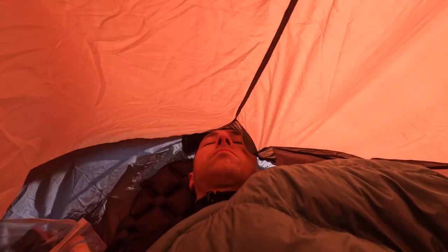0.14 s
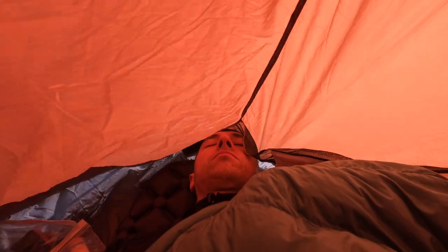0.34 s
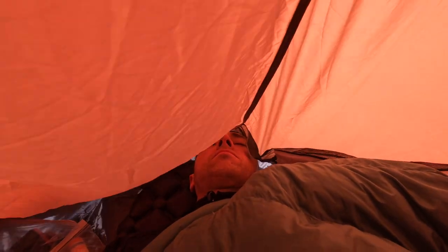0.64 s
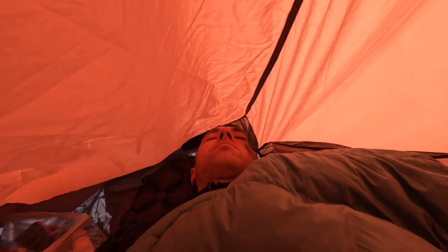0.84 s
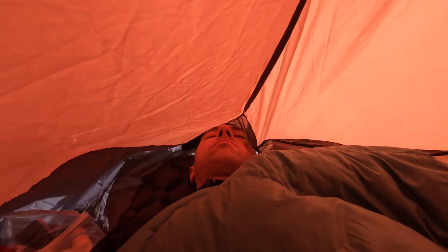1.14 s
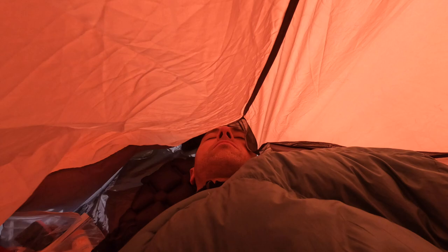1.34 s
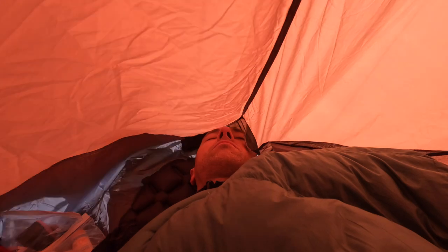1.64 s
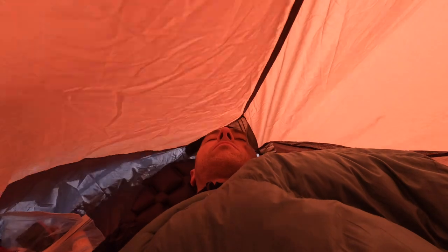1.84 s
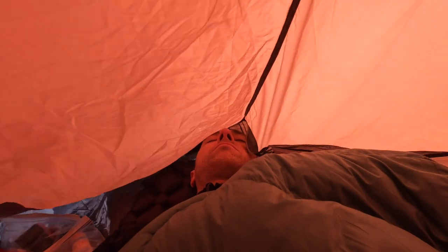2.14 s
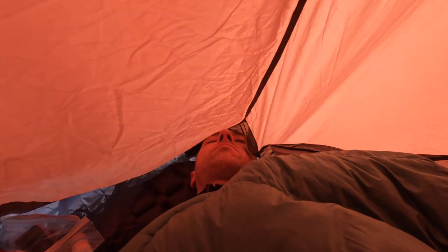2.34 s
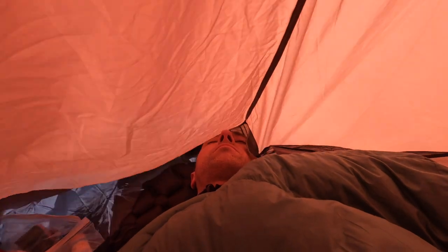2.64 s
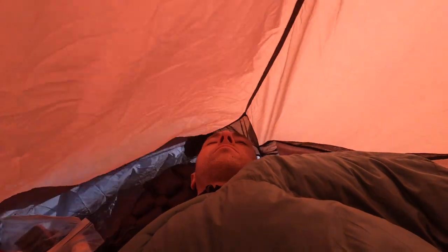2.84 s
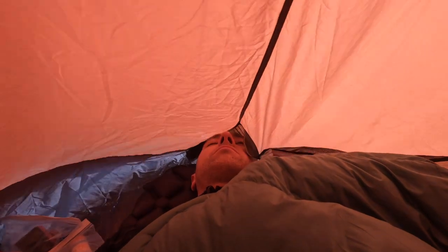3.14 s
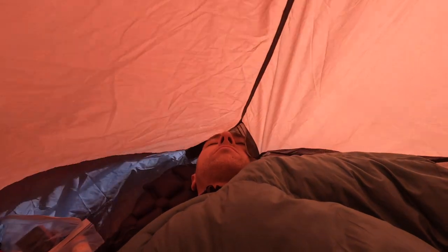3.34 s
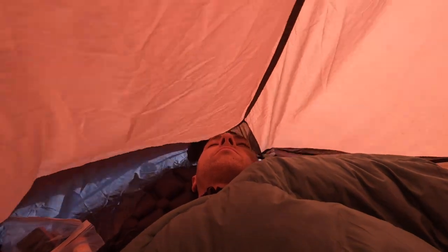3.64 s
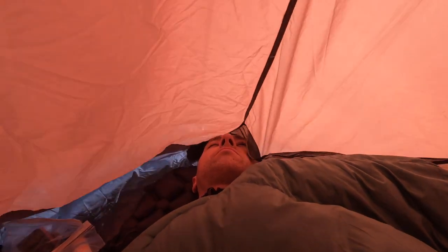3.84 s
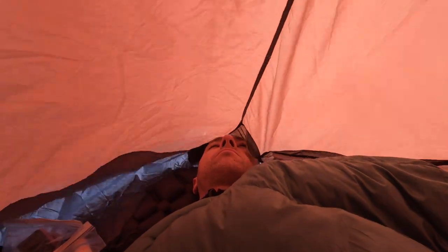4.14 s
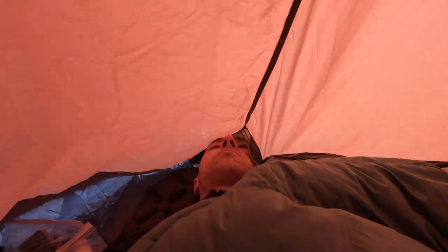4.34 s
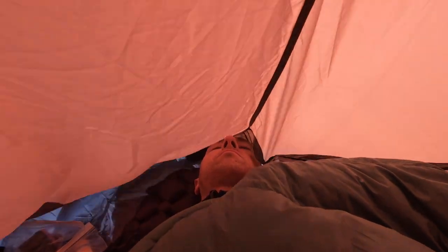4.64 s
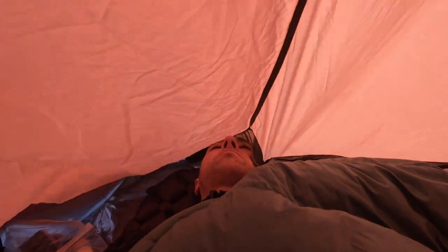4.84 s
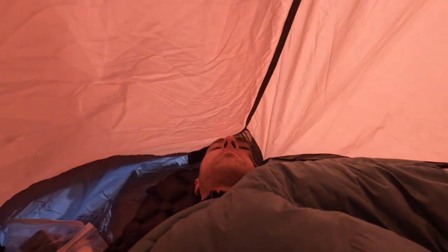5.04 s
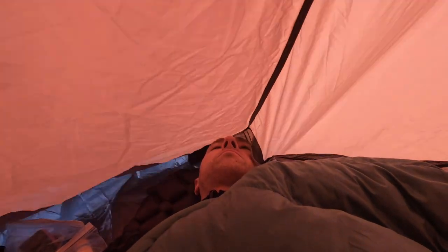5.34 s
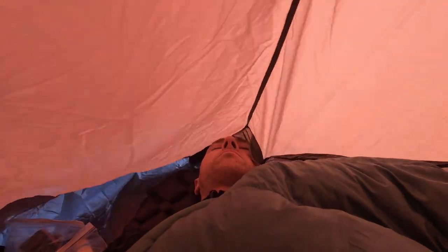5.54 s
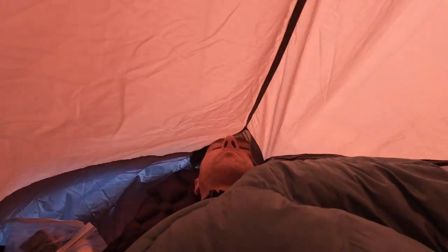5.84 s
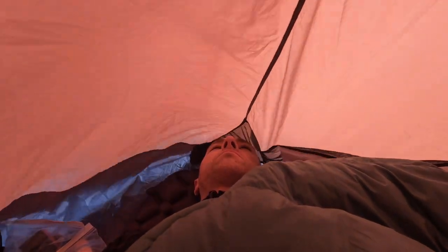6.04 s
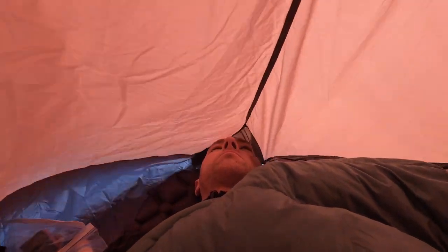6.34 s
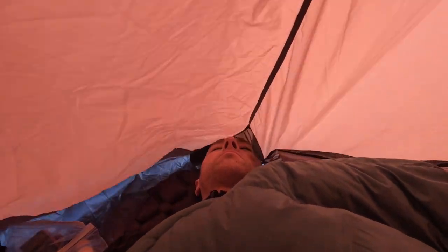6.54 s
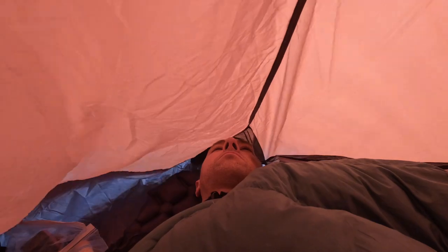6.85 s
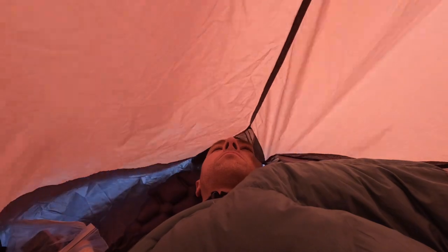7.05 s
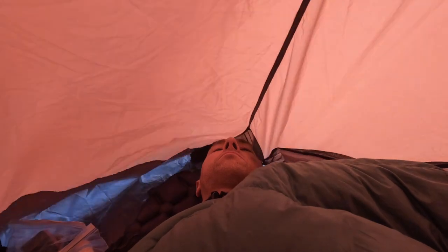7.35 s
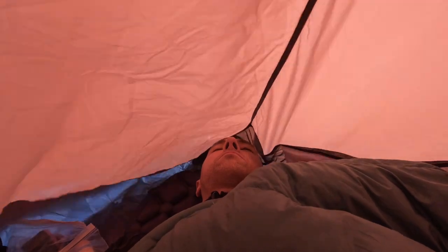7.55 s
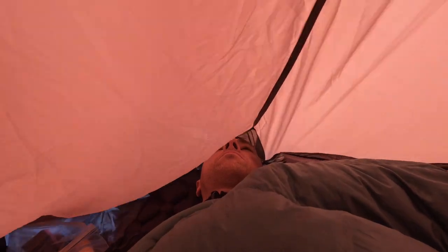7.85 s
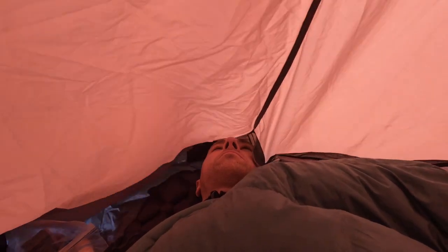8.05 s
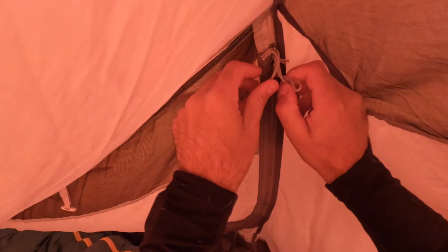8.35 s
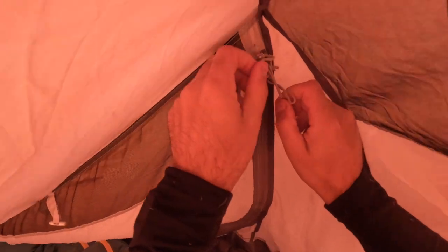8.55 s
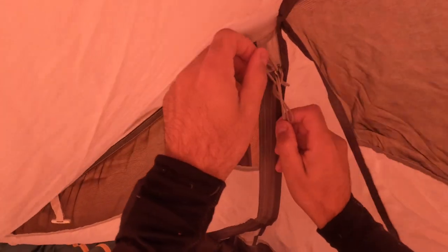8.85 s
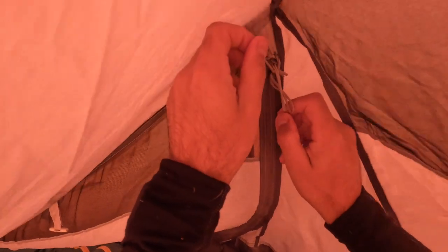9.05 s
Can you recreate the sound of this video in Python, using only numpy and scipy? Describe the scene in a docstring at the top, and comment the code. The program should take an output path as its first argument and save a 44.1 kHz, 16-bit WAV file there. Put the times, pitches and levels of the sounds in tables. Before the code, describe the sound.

Inside a small tent in strong wind, caught by a close, muffled camera microphone, almost mono. From 0 s a deep rumble pumps with dull wall flaps and little brightness; from about 0.9 s blunt thuds and the first snaps arrive. Around 1.5-2.5 s a gust brings dense crinkling, sharp crease ticks and taut cracks, and the sound widens slightly. Snaps cluster at 2.7-3 s, then it eases from 3.3 to 4.2 s before narrowing to the centre. Hard snaps hit at about 4.6 and 4.75 s, with further thumps and flaps to 5.8 s. The strongest crack comes near 6.2 s amid heavy buffeting; bright rustling and pops surge again at 7.0-8.2 s. A faint, very high airy whistle leans left. At about 8.25 s the crinkle stops dead, leaving low drumming rumble, dull flaps, two soft snaps, and a rising swell at 9.2 s.

```python
"""Small tent in a gale

Heard by a camera in a closed housing: gusts pump the tent air (low noise) and buffet the wall (short swings).
The walls flap with a dull roar, crinkle brightly when they whip (flickering noise), and snap taut (brief rings).
The left port whistles thinly near the top (narrow noise). Apart from that whistle the sound is
single-microphone, opens to two ports for a few seconds, and closes; near the end the crinkle stops dead."""
import sys
import numpy as np
from scipy import signal
from scipy.fft import rfft, irfft, next_fast_len
from scipy.io import wavfile
from scipy.ndimage import uniform_filter1d

SR = 44100
rng = np.random.default_rng(int(sys.argv[2]) if len(sys.argv) > 2 else 0)


def put_to_file(sound):
    """Save the sound as 16-bit audio at rate SR, in the file named by the first command-line argument."""
    columns = np.atleast_2d(sound).T  # one column per channel
    safe = np.clip(columns, -1, 1)
    whole_steps = np.round(safe * 32767)
    wavfile.write(sys.argv[1], SR, whole_steps.astype(np.int16))


N = 405279

# Air and wall between flaps: time_s, pumping_db, flap_roar_db, crinkle_db
WIND_LEVELS = [(0, -26, -32, -59), (.5, -27, -36, -59), (1, -25, -35, -53.5), (1.55, -24, -35, -50),
               (1.93, -22, -32, -48), (2, -20, -28.5, -42), (2.3, -20, -28, -41), (2.65, -21.5, -32, -44.5),
               (3.05, -21, -35, -46.5), (3.3, -25, -42, -49.5), (3.8, -27, -41, -55), (4.1, -29, -39, -55),
               (4.4, -25, -35, -48.5), (5, -28, -39, -50), (5.3, -24, -31, -45), (5.68, -26, -36.5, -46.5),
               (5.95, -19.5, -29, -39.5), (6.05, -23, -37, -46.5), (6.62, -23, -35.5, -43.5),
               (6.93, -24, -43, -54), (7.02, -23, -34, -43.5), (7.5, -19.5, -30, -40),
               (8.25, -21, -30, -40), (8.258, -21, -33, -80), (8.4, -27, -40, -80), (8.5, -24, -35.5, -80),
               (9.07, -29, -42, -80), (9.19, -28, -31, -66)]
# Drumming of the taut wall, compared with the pumping: time_s, level_db
DRUM_LEVELS = [(0, -2), (1, -14), (4, -20), (8.2, -17), (8.4, -7), (9.19, 3)]
DRUM_HZ, DRUM_WIDTH_HZ = 76.3, 59
# Single buffets on the wall: start_s, peak_db, thud_hz
WALL_BUFFETS = [(0.89, -15.5, 99), (1.092, -13, 112), (1.304, -18, 61), (1.518, -16.5, 80),
                (1.833, -18.5, 73.5), (1.968, -11.5, 223), (2.153, -12, 118), (2.463, -12, 113),
                (3.605, -17.5, 61), (3.878, -15, 96.9), (4.318, -16.5, 135), (4.568, -26, 61.9),
                (4.661, -18.5, 84), (4.868, -17, 67.3), (5.051, -17.5, 121), (5.463, -10.5, 112),
                (5.756, -14.5, 61), (5.944, -15.5, 75.4), (6.211, -10, 95), (6.259, -16.5, 88.8),
                (7.07, -12.5, 96), (7.545, -12, 139), (7.946, -15, 98), (8.73, -16.5, 64.6)]

# Wind hiss in the left port, before a boost in whistle(): time_s, level_db
PORT_HISS = [(0, -63), (.5, -74), (2, -71), (3, -73), (4.1, -77), (4.4, -64), (5.1, -73), (6, -69),
             (8.2, -74), (8.36, -83), (8.58, -67), (8.75, -74), (9.1, -78), (9.19, -62)]
# Puffs of air across the left port: middle_s, length_s, swell_db
PORT_PUFFS = [(1.69, .1, 5), (2.05, .1, 6), (4.24, .06, 13), (7.32, .05, 12), (7.5, .07, 14)]
WHISTLE_RIGHT_DB = -12

# The wall flaps over: middle_s, length_s, dull_swell_db, bright_swell_db
WALL_FLAPS = [(.17, .124, 8, 1), (.25, .04, 0, 5), (.41, .06, 5, 6), (.625, .05, 4, 5), (.79, .05, 4, 1),
              (.895, .045, 3, 2), (1.118, .062, 7, 9), (1.255, .13, 7, 9), (1.44, .06, 4, 6),
              (1.53, .04, 2, 6), (1.72, .2, 5, 9), (1.85, .06, 3, 6), (1.985, .05, 5, 5), (2.06, .1, 2, 6),
              (2.165, .056, 3, 6), (2.27, .04, 1, 4), (2.52, .136, 3, 6), (3.165, .124, 7, 7),
              (3.25, .04, 2, 4), (3.39, .08, 3, 4), (3.46, .04, 6, 6), (3.62, .046, 4, 9), (3.75, .1, 3, 3),
              (3.885, .05, 5, 1), (4.24, .077, 4, 6), (4.295, .07, 6, 8), (4.445, .06, 4, 6),
              (4.67, .04, 8, 2), (4.63, .04, 0, 4), (4.925, .045, 5, 5), (5.18, .05, 2, 4),
              (5.28, .05, 1, 3), (5.49, .11, 9, 7), (5.58, .07, 1, 5), (5.79, .07, 4, 1),
              (6.2, .062, 7, 12), (6.295, .08, 10, 10), (6.42, .09, 5, 6), (6.52, .04, 2, 4),
              (6.765, .165, 5, 10), (7.08, .062, 4, 6), (7.205, .069, 7, 5), (7.325, .051, 3, 8),
              (7.505, .084, 2, 8), (7.64, .085, 7, 4), (7.715, .04, 1, 6), (8.04, .06, 2, 3),
              (8.56, .13, 6, 0), (8.93, .15, 8, 0)]
AIR_SHARE = .8  # of the dull swell, for the pumping
HISS_SHARE = .6  # of the bright swell, for the hiss

# Sharp creases, before the gain of each layer they drive: start_s, peak_db
CREASE_TICKS = [(.8889, -28), (1.4287, -27), (1.652, -22), (1.6821, -22), (1.8267, -27), (1.9733, -28),
                (1.9844, -22), (2.0295, -18), (2.0777, -19), (2.093, -20), (2.1356, -19), (2.1635, -22),
                (3.3064, -29), (3.6184, -22), (4.2882, -30), (4.4258, -26), (4.611, -27), (5.102, -26.5),
                (5.1986, -30), (5.275, -23), (5.365, -29), (6.0028, -24), (6.108, -27), (6.1599, -28),
                (6.1774, -27), (6.2068, -23), (6.3044, -27), (6.5056, -22), (6.788, -20), (7.0369, -22),
                (7.0803, -26), (7.217, -22), (7.2988, -26), (7.3148, -16), (7.4825, -13), (7.5492, -17),
                (7.5797, -27), (7.6316, -27), (7.675, -27), (7.7084, -15), (7.9139, -24), (8.0257, -27)]
TICK_T60_S = .043  # time to fade by 60 dB

# Cloth snapping taut, the ring alone before the housing dulls it: start_s, peak_db, ring_hz
TAUT_SNAPS = [(.633, -18.5, 689), (.889, -20, 945), (1.055, -21, 985), (1.093, -15, 1000),
              (1.423, -19, 580), (1.524, -12, 1030), (1.729, -16, 1580), (1.968, -16, 1730),
              (2.058, -14, 1300), (2.165, -13, 1500), (2.719, -9, 1110), (2.763, -19, 1460),
              (2.8, -15, 940), (2.866, -19, 1010), (3.002, -14, 1240), (3.458, -17.5, 2190),
              (4.224, -19.5, 2100), (4.287, -12, 1510), (4.385, -19, 2100), (4.576, -7.5, 850),
              (4.61, -21.5, 2170), (4.754, -7.5, 1060), (4.808, -15, 2110), (5.056, -16.5, 870),
              (5.101, -19, 1800), (5.199, -22, 2200), (5.224, -12, 850), (5.397, -10, 1600),
              (5.82, -14, 894), (5.856, -19, 910), (5.959, -13, 1080), (6.002, -18, 2170),
              (6.104, -18, 2230), (6.164, -20, 2330), (6.223, -3, 1030), (6.372, -12, 1400),
              (6.471, -19, 2240), (6.506, -20, 1990), (6.608, -15.5, 790), (6.713, -12, 2350),
              (7.184, -7, 2240), (7.222, -12.5, 762), (7.28, -19, 1630), (7.298, -14, 2130),
              (7.515, -9, 2250), (7.578, -15, 990), (7.609, -11.5, 900), (7.705, -16, 1620),
              (7.835, -11, 1550), (7.913, -17, 2020), (8.041, -14, 1000), (8.193, -15, 1360),
              (8.636, -24, 622), (8.869, -19.5, 680)]
# A harder snap leaves the cloth tauter and its ring shorter: 60 dB fade at -20 dB, and its change
RING_T60_S, RING_S_PER_DB = .019, -.001
# Lesser snaps: least peak above the roar, spread of peaks, range of rings
STRAY_DB, STRAY_SPREAD_DB, STRAY_HZ = 10, 6, (900, 2300)

# How wide the sound is, as the share of the second port: time_s, share (0 to 1)
PORT_WIDTH = [(0, 0), (.4, 0.04), (1.4, 0.15), (1.7, 0.3), (2.3, 0.31), (3.5, 0.46), (3.8, 0.2),
              (4.1, 0.08), (4.3, 0), (9.19, 0)]

# Tone colours, as filter shapes whose overall level is set elsewhere: pitch_hz, level_db
PUMP_COLOUR = [(8, -25), (20, 4.5), (45, 0.5), (100, -6), (180, -13), (300, -21.5), (700, -78.5)]  # squeezed air
FLAP_COLOUR = [(70, -10.5), (160, 0.5), (300, -0.5), (600, -8), (1000, -8), (1900, -14.5), (2300, -19.5),
               (3000, -29.5), (4000, -41.5), (8000, -73), (15000, -100)]  # flapping wall
CRINKLE_COLOUR = [(600, -3.5), (1200, 0.5), (1800, 4.5), (2200, 7), (2850, -7), (3600, -4), (5000, -12),
                  (7000, -20), (8500, -23.5), (10500, -32.5), (12000, -31), (15600, -62)]  # rustle through one microphone
CRINKLE_OPEN_COLOUR = [(600, -24.5), (1200, 3), (1800, -2.5), (2200, -2.5), (2850, -6), (3600, -14),
                       (5000, -11.5), (7000, -15), (8500, -33), (10500, -27.5), (12000, -47),
                       (15600, -51.5)]  # rustle through the open ports
CREASE_COLOUR = [(1000, -27), (2200, 0), (2850, -6.5), (3600, 0), (5000, -4.5), (7000, -9), (9000, -21.5),
                 (11000, -21.5), (15600, -31)]  # sharp creases
PORT_COLOUR = [(9000, -55), (11000, -26), (11700, -8), (12300, 0), (13000, -6), (14000, -15), (15600, -23)]  # resonance of the narrow ports
# Gap between the ports, used directly as gain: pitch_hz, level_db
PORT_GAP_GAIN = [(60, -44), (200, -49), (380, -28.5), (700, -20), (1300, -15), (2400, -9), (4400, -9),
                 (15000, -6)]
# Edges of the cloth noise bands that flicker apart: pitch_hz
PATCH_EDGES_HZ = [1478, 2800, 4480, 7120]

TOP_HZ = 15720


def undb(db):
    """Turn decibels into gain."""
    return 10 ** (np.asarray(db) / 20)


def curves(table):
    """Join the points of each table column with straight lines, one value a sample."""
    s, *columns = np.transpose(table)
    return [np.interp(np.arange(N) / SR, s, c) for c in columns]


def swells(table):
    """Bell-shaped swells in dB, summed for each strength column; length is the width at half height."""
    t = np.arange(0, N + 64, 64) / SR  # coarse time steps save work
    s, length, *strengths = np.transpose(table)
    distance = 2 * (t[:, None] - s) / np.maximum(length, .02)
    bells = 2. ** -distance ** 2
    return [np.interp(np.arange(N) / SR, t, bells @ np.maximum(db, 0)) for db in strengths]


def colour(x, points, size=4096):
    """Filter through the given points without sounding early, by folding the cepstrum of the log gain."""
    hz, db = np.transpose(points)
    grid = np.maximum(np.arange(size // 2 + 1) * SR / size, 1)
    log_gain = np.interp(np.log(grid), np.log(hz), db) * np.log(10) / 20
    cepstrum = irfft(log_gain)
    cepstrum[1:size // 2] *= 2
    cepstrum[size // 2 + 1:] = 0
    impulse = irfft(np.exp(rfft(cepstrum)))
    impulse = np.broadcast_to(impulse, x.shape[:-1] + (size,))
    return signal.oaconvolve(x, impulse, axes=-1)[..., :N]


def unit(x, lo_hz, hi_hz):
    """Scale all rows so that the band lo-hi of the first row has an rms of 1."""
    power = np.abs(rfft(x[0])) ** 2
    band_power = power[int(lo_hz * N / SR):int(hi_hz * N / SR)].sum()
    return x * N / np.sqrt(2 * band_power)


def shivers(rate, spread_db, t60, steady, rise=0.0013):
    """Random jolts a second rise fast and fade over a steady part; the level evens out over 1/8 s."""
    size = np.minimum(rng.exponential(size=N), 2.5)
    jolts = (rng.random(N) < rate / SR) * undb(spread_db * size)
    fade = np.exp(-np.log(1000) / (max(t60, .002) * SR))
    jolts = signal.lfilter([1], [1, -fade], jolts)
    jolts = uniform_filter1d(jolts, 1 + int(rise * SR))
    envelope = steady + jolts / np.sqrt(np.mean(jolts ** 2))
    return envelope / np.sqrt(uniform_filter1d(envelope ** 2, SR // 8))


def pumping(db):
    """Gusts squeeze the air of the tent in a low rumble and drum on the wall."""
    push = shivers(rate=25, spread_db=0.0, t60=0.11, steady=3.6) * rng.standard_normal((2, N))
    edges = DRUM_HZ + np.array([-.5, .5]) * DRUM_WIDTH_HZ
    drum = signal.sosfilt(signal.butter(2, edges, "band", fs=SR, output="sos"), push[1])
    rumble = unit(colour(push[:1], PUMP_COLOUR), lo_hz=20, hi_hz=250)[0]
    return undb(db) * (rumble + undb(curves(DRUM_LEVELS)[0]) * drum / drum.std())


def buffets(cycles=1.75):
    """Each buffet is a blunt swing of the wall, a couple of cycles long."""
    out, t = np.zeros(N + SR), np.arange(SR // 5) / SR
    for s, db, hz in WALL_BUFFETS:
        fade = np.exp(-np.log(1000) * hz * t / (2 * cycles))
        swing = hz * t * np.sin(2 * np.pi * hz * t) * fade
        start = int(s * SR)
        out[start:start + len(t)] += undb(db) * swing / np.abs(swing).max()
    return out[:N]


def whistle(hiss_db, drive, cloth_db=-26.0):
    """The narrow ports resonate high up, the left far more, on wind hiss and cloth noise alike."""
    hiss = undb(hiss_db + 6.0) * shivers(rate=60, spread_db=5.0, t60=.03, steady=.8)
    noise = rng.standard_normal((2, N))
    driven = (hiss + undb(cloth_db) * drive) * noise
    tone = colour(driven, PORT_COLOUR) / colour(noise, PORT_COLOUR).std()
    return tone * undb([[0], [WHISTLE_RIGHT_DB]])


def flapping(db, whip):
    """Walls beat to and fro: dull noise in short slaps, one row shared and one for the port gap."""
    slaps = whip ** 0.19 * shivers(rate=90, spread_db=2.0, t60=0.031, steady=1.41)
    roar = colour(slaps * rng.standard_normal((2, N)), FLAP_COLOUR)
    return undb(db) * unit(roar, lo_hz=300, hi_hz=1300)


def patchy(rate, spread_db, t60, steady):
    """Two noises whose bands flicker apart: folds of every size move on their own."""
    size = next_fast_len(N)
    band = np.searchsorted(PATCH_EDGES_HZ, np.arange(size // 2 + 1) * SR / size)
    white = rfft(rng.standard_normal((2, N)), size)
    return sum(shivers(rate, spread_db, t60, steady) * irfft(white * (band == k), size)[:, :N]
               for k in range(len(PATCH_EDGES_HZ) + 1))


def crinkling(drive, width):
    """Coated cloth rustles in dense tiny cracks; the open ports hear them with another colour."""
    noise = patchy(rate=70, spread_db=2.5, t60=0.023, steady=2.8)
    noise = noise * shivers(rate=220, spread_db=5.0, t60=0.0076, steady=3.0, rise=.0008)
    out = 0
    for share, points in ((1 - width, CRINKLE_COLOUR), (width, CRINKLE_OPEN_COLOUR)):
        # set the level from the steady rustle, so that the drive keeps its own
        plain = colour(noise, points)
        scale = unit(plain, lo_hz=2800, hi_hz=9000).std() / plain.std()
        out = out + share * scale * colour(drive * noise, points)
    return out


def creases(rise=0.0013):
    """Envelope of the sharp creases: each a burst that rises fast and dies in milliseconds."""
    envelope, t = np.zeros(N + SR), np.arange(SR // 10) / SR
    burst = np.minimum(t / rise, 1) * np.exp(-np.log(1000) * t / TICK_T60_S)
    for s, db in CREASE_TICKS:
        start = int(s * SR)
        envelope[start:start + len(t)] += undb(db) * burst
    return envelope[:N]


def creasing(envelope, gain_db=-8.0):
    """Sharp creases in the cloth give short bursts of bright noise."""
    noise = rng.standard_normal((2, N))
    return undb(gain_db) * colour(envelope * noise, CREASE_COLOUR) / colour(noise, CREASE_COLOUR).std()


def strays(roar_db, count=36):
    """Lesser snaps at random moments, as strong as the flapping allows: rows like TAUT_SNAPS."""
    when, size, pitch = rng.random((count, 3)).T
    db = roar_db[(when * N).astype(int)] + STRAY_DB + STRAY_SPREAD_DB * size
    hz = STRAY_HZ[0] * (STRAY_HZ[1] / STRAY_HZ[0]) ** pitch
    return np.transpose([when * N / SR, db, hz])


def snaps(rows, thump_db=-1.5, thump_hz=200, thump_t60=0.026, crack_db=0.0, crack_t60=.012, housing_hz=2700):
    """Each snap is a short ring and a burst of noise over a thump of pushed air; the housing dulls it."""
    out, t = np.zeros(N + SR), np.arange(SR // 20) / SR
    fall = -np.log(1000) * t
    thump = undb(thump_db) * np.sin(2 * np.pi * thump_hz * t) * np.exp(fall / thump_t60)
    cracks = undb(crack_db) * rng.standard_normal((len(rows), len(t))) * np.exp(fall / crack_t60)
    for (s, db, hz), crack in zip(rows, cracks):
        t60 = RING_T60_S + RING_S_PER_DB * (db + 20)
        ring = np.sin(2 * np.pi * hz * t) * np.exp(fall / max(t60, .008))
        start = int(s * SR)
        out[start:start + len(t)] += undb(db) * (ring / np.abs(ring).max() + thump + crack)
    return signal.sosfilt(signal.butter(6, housing_hz, fs=SR, output="sos"), out[:N])


def port_gap(x):
    """The gap between left and right mostly grows with pitch; this filter adds no delay."""
    hz, db = np.transpose(PORT_GAP_GAIN)
    size = next_fast_len(N)
    grid = np.maximum(np.arange(size // 2 + 1) * SR / size, 1)
    gain = undb(np.interp(np.log(grid), np.log(hz), db))
    return irfft(rfft(x, size) * gain, size)[:N]


def scene():
    """One shared microphone, plus the gap between the two ports while they are blended in."""
    dull_db, bright_db = swells(WALL_FLAPS)
    pump_db, flap_db, crinkle_db = curves(WIND_LEVELS)
    pump_db = pump_db + AIR_SHARE * dull_db
    flap_db = flap_db + dull_db
    hiss_db = curves(PORT_HISS)[0] + HISS_SHARE * bright_db + swells(PORT_PUFFS)[0]
    width = np.clip(curves(PORT_WIDTH)[0], 0, 1)

    # one whipping motion of the wall shakes the roar and the rustle together
    whip = shivers(rate=35, spread_db=2.5, t60=0.038, steady=1.3, rise=0.0029)
    rustle = undb(crinkle_db + bright_db) * whip ** 0.61
    sharp = creases()
    cloth = flapping(flap_db, whip) + crinkling(rustle, width) + creasing(sharp)

    all_snaps = np.vstack([TAUT_SNAPS, strays(flap_db)])
    shared = pumping(pump_db) + buffets() + cloth[0] + snaps(all_snaps)
    # the windward wall is on the left, so part of the gap is the shared sound itself
    gap = width * port_gap(1.75 * shared + 4.3 * cloth[1])
    left_right = shared + gap * np.array([[1], [-1]])
    return left_right + whistle(hiss_db, rustle + 0.54 * sharp)


def record(dry, knee=1.0):
    """The camera rounds the loudest swings and cuts the top steeply."""
    rounded = knee * np.tanh(dry / knee)
    return signal.sosfilt(signal.ellip(16, .3, 90, TOP_HZ, fs=SR, output="sos"), rounded)


dry = scene()
out = record(dry)
put_to_file(out)
```